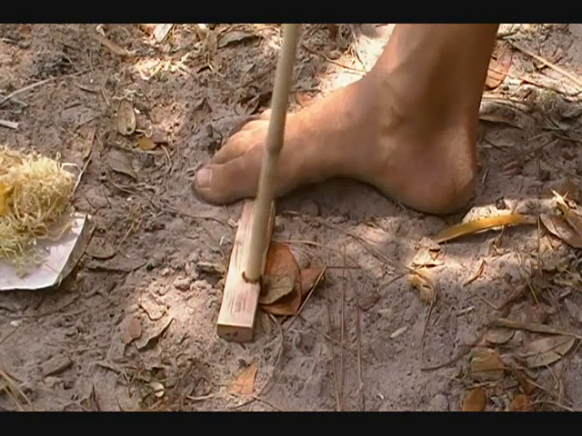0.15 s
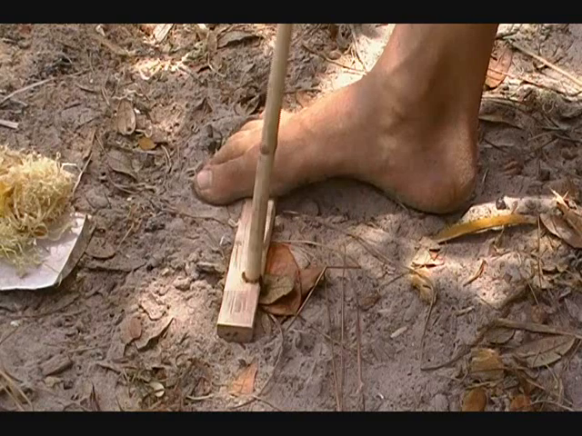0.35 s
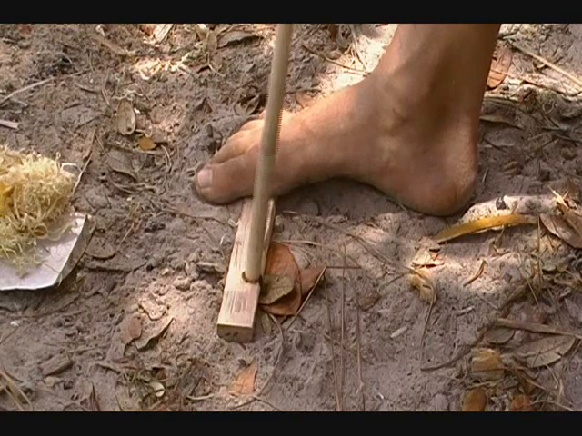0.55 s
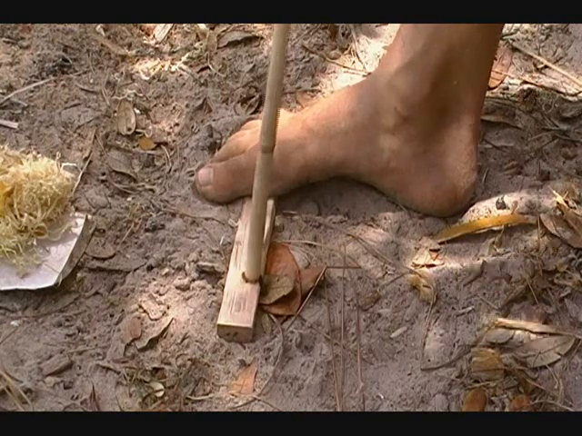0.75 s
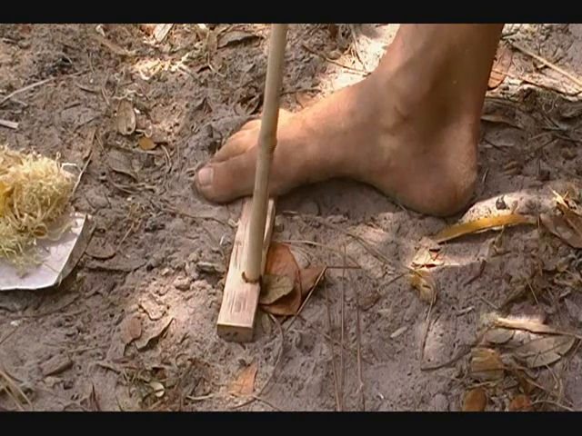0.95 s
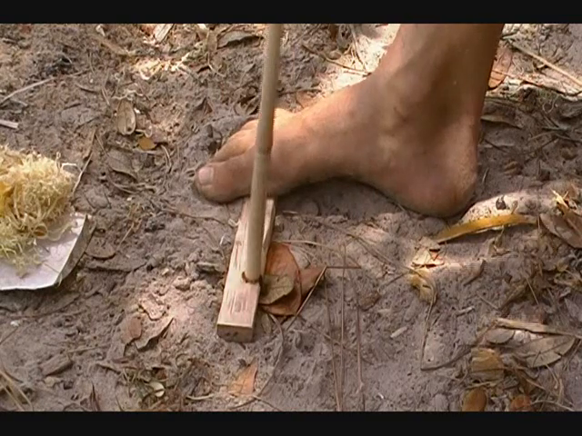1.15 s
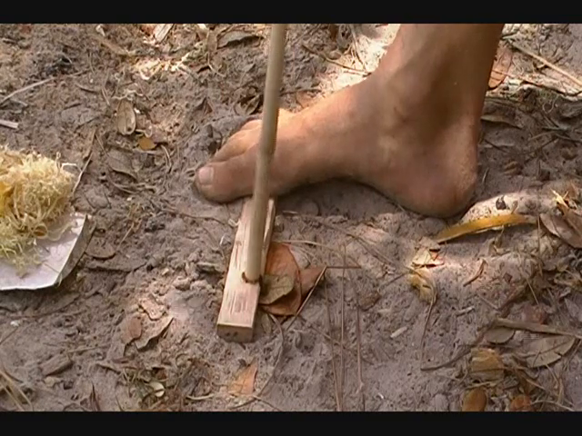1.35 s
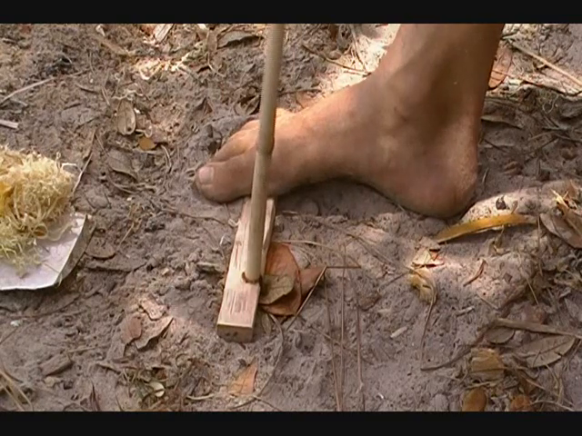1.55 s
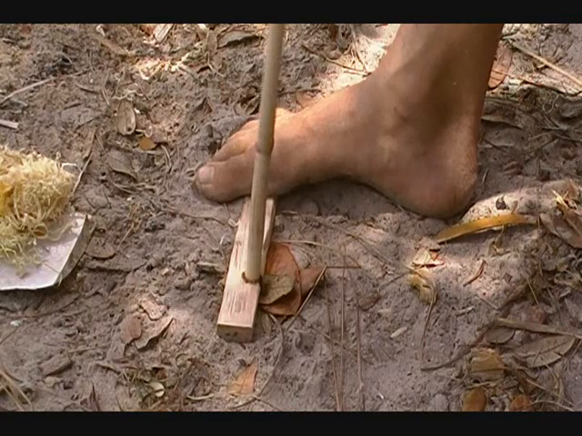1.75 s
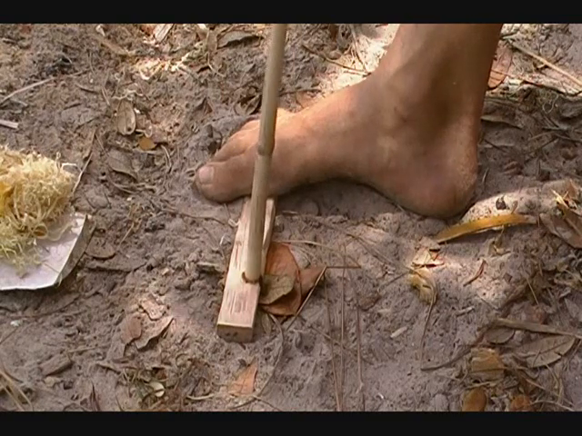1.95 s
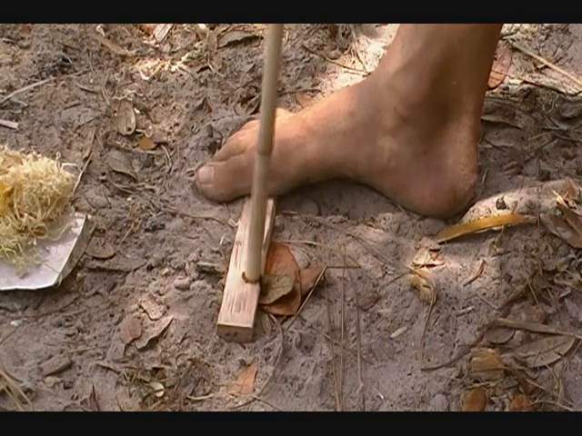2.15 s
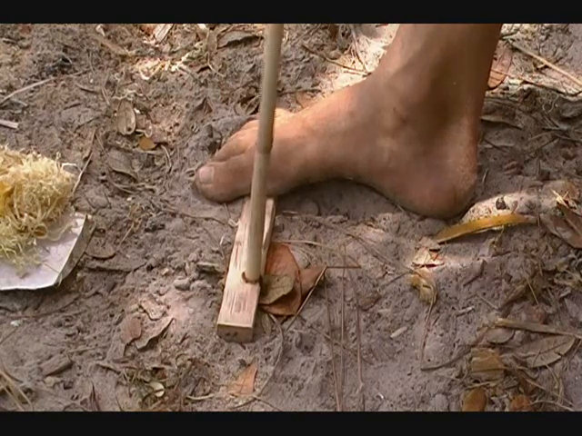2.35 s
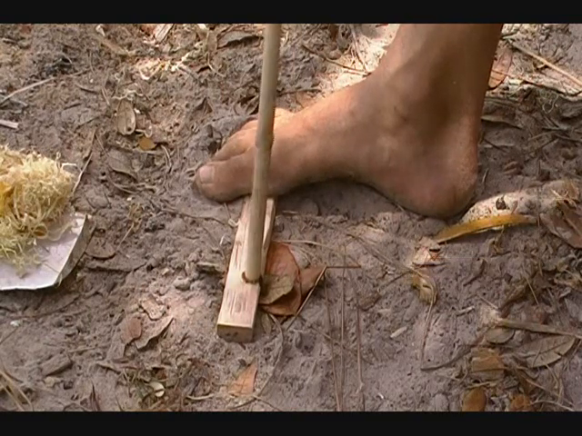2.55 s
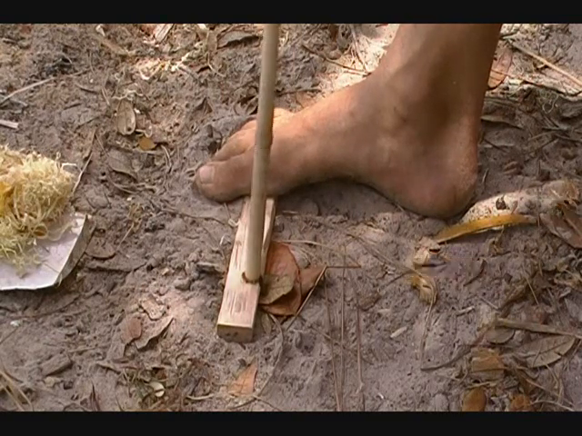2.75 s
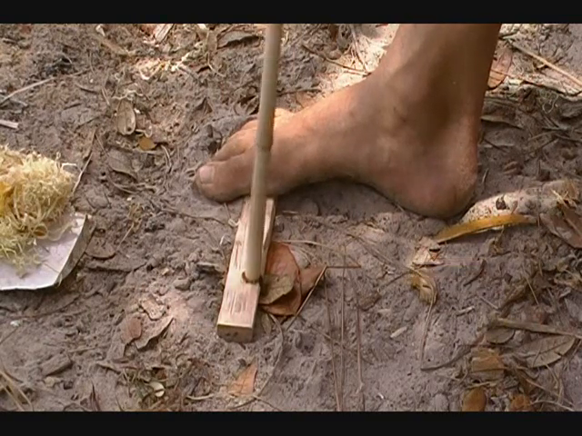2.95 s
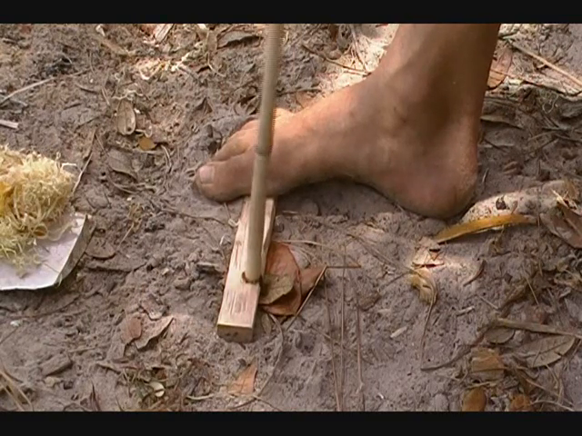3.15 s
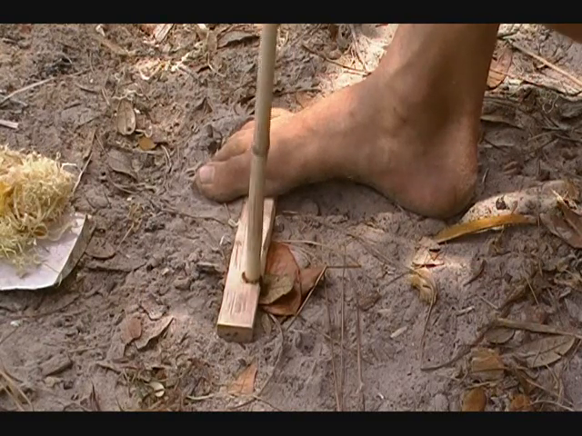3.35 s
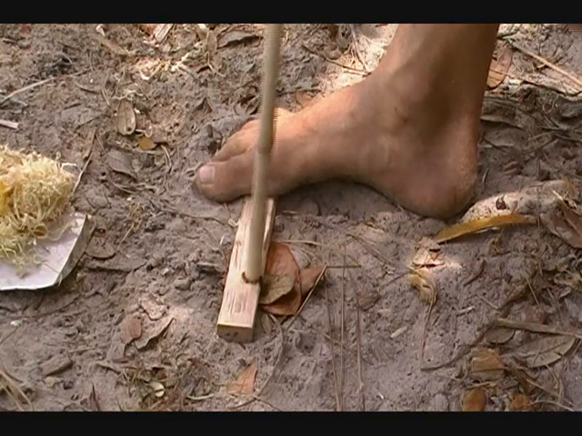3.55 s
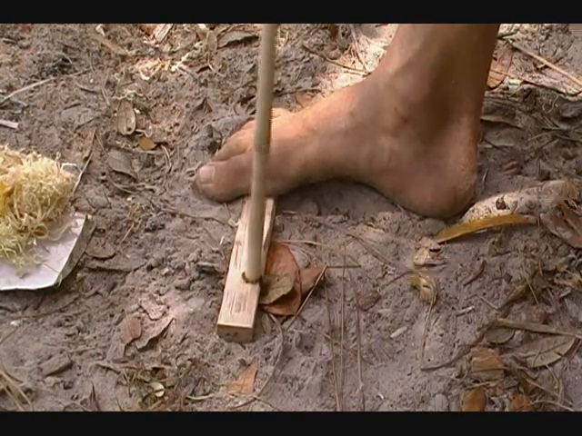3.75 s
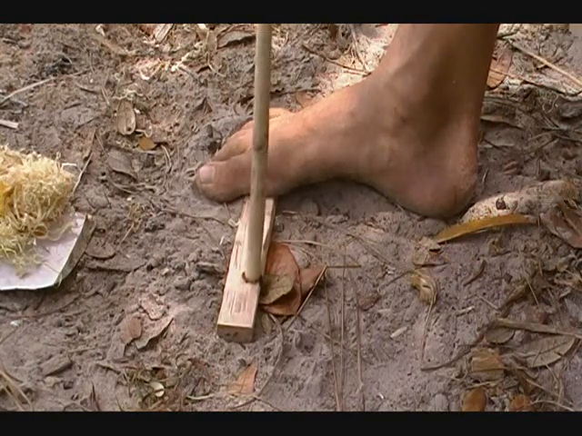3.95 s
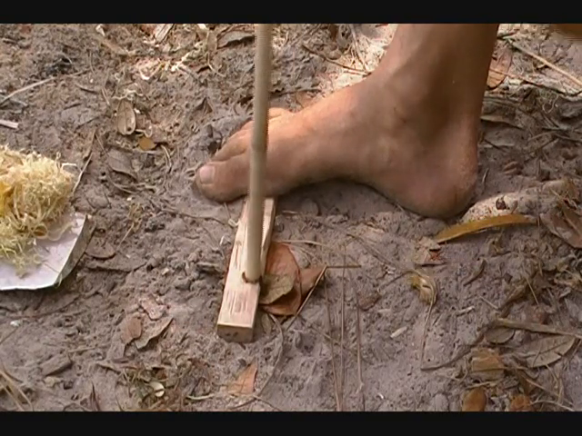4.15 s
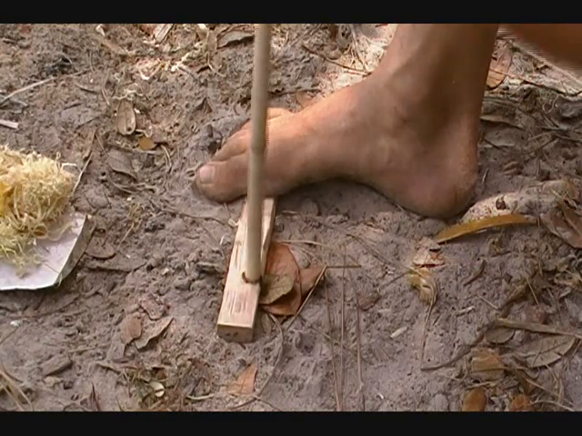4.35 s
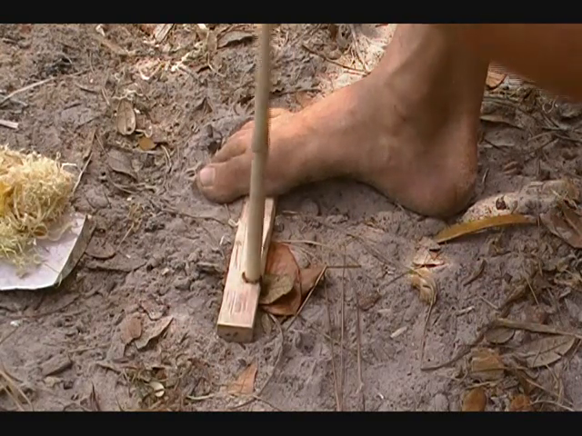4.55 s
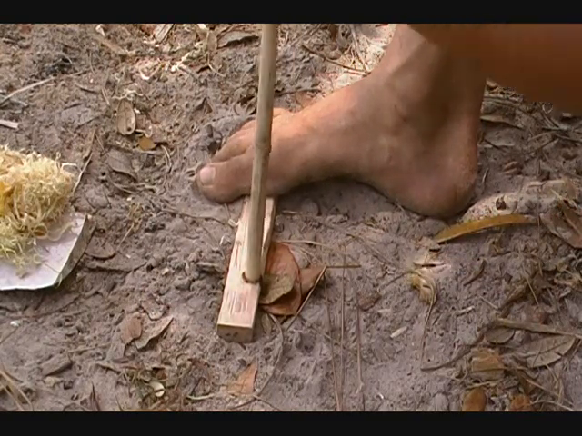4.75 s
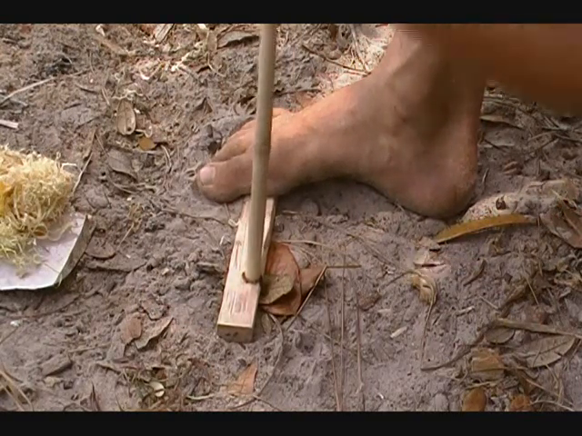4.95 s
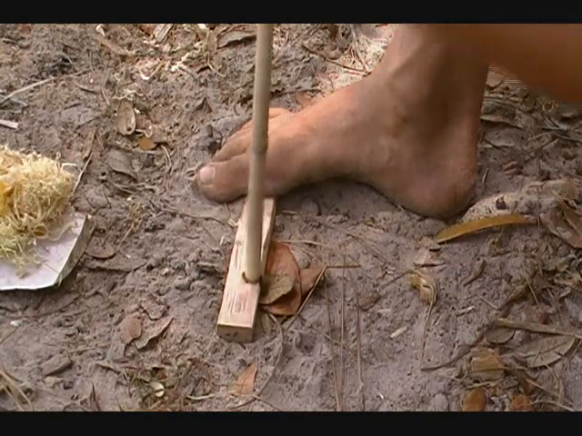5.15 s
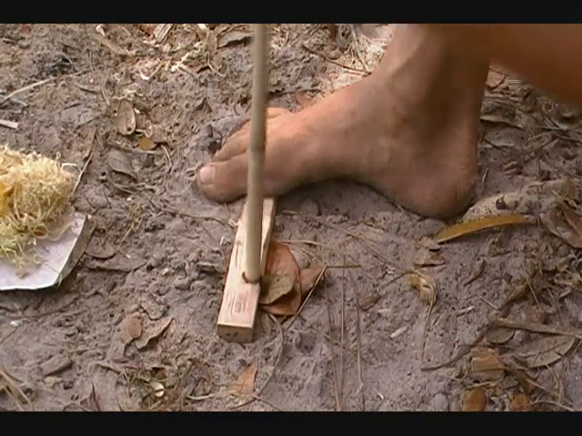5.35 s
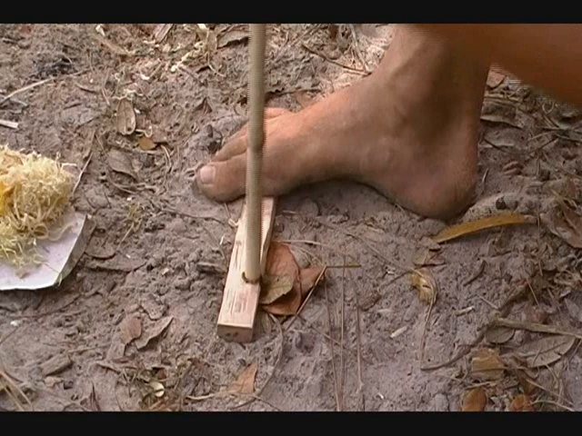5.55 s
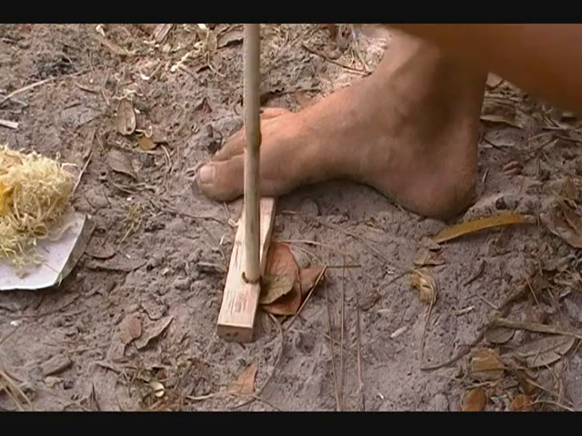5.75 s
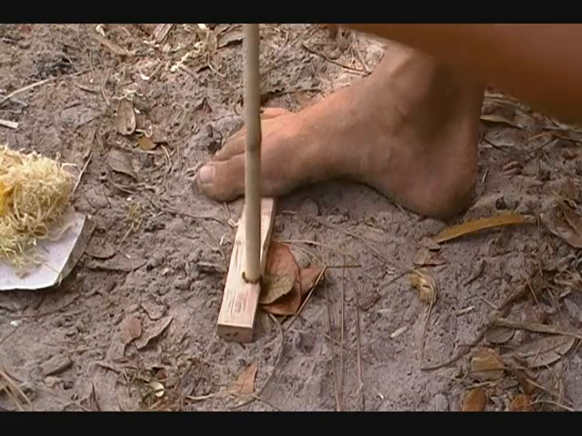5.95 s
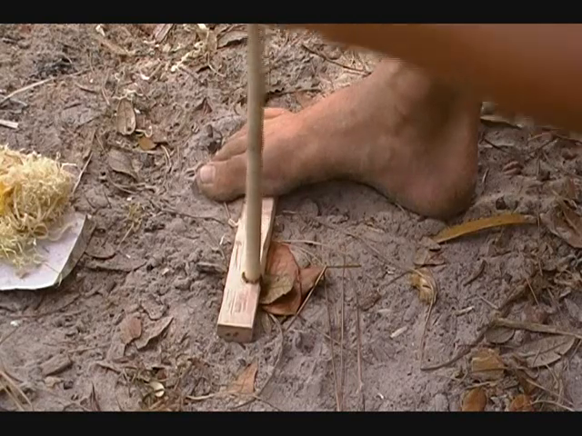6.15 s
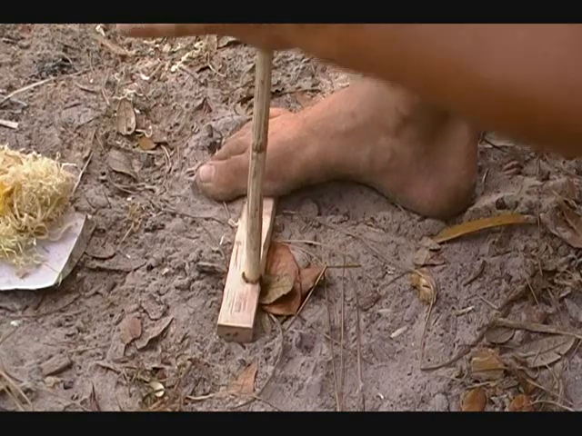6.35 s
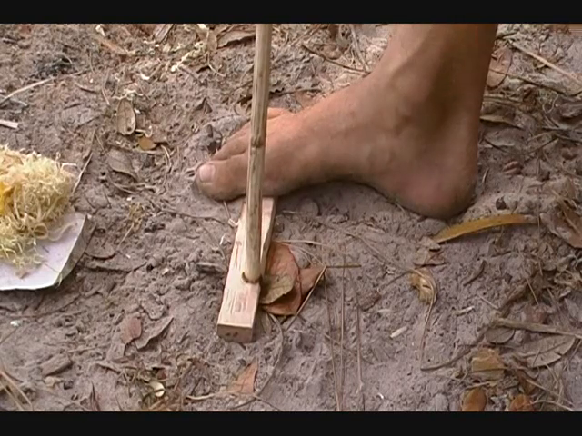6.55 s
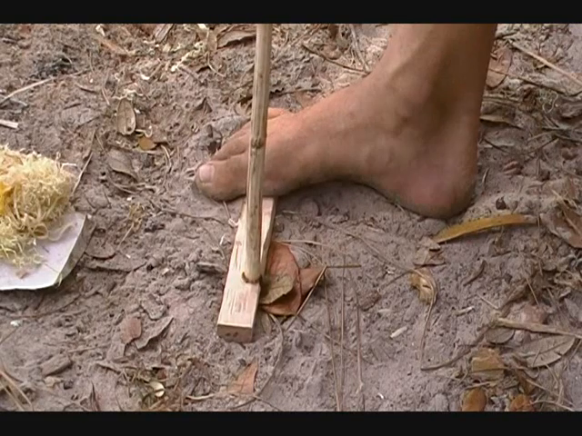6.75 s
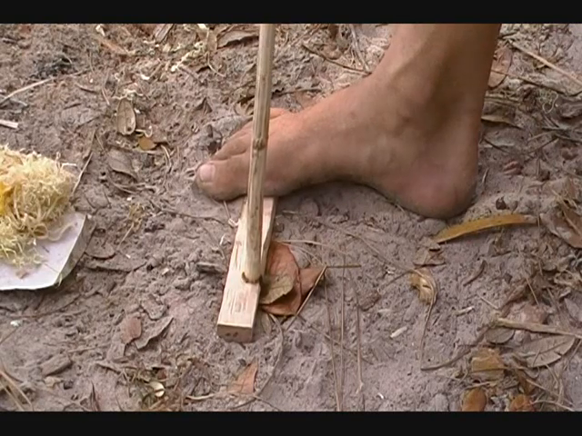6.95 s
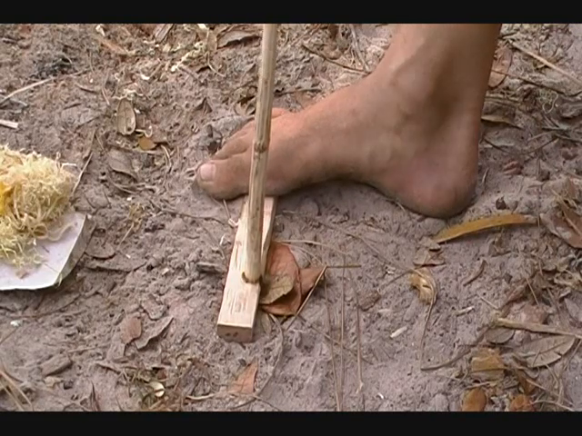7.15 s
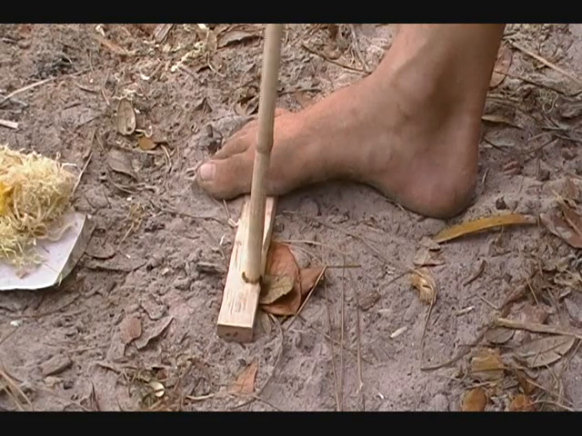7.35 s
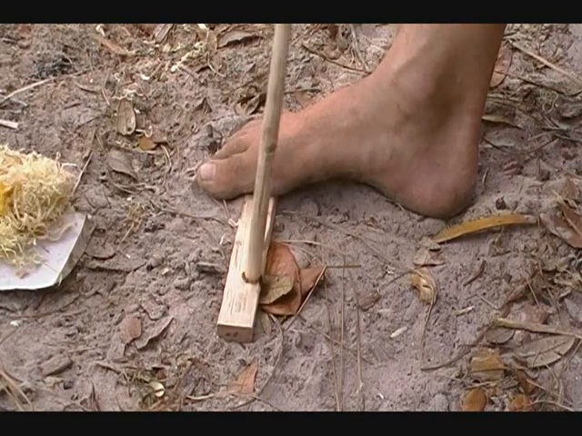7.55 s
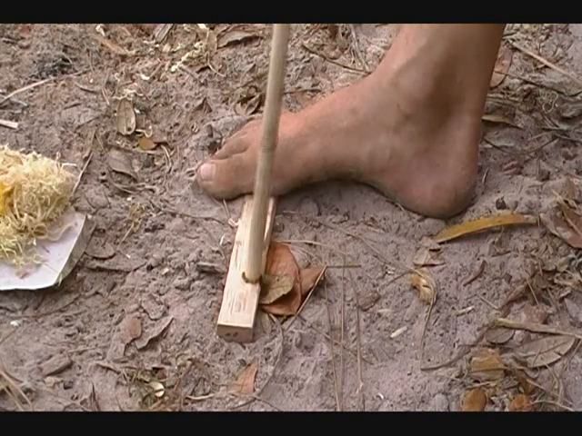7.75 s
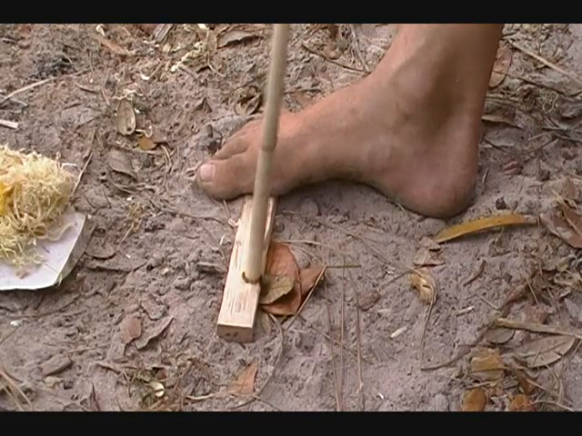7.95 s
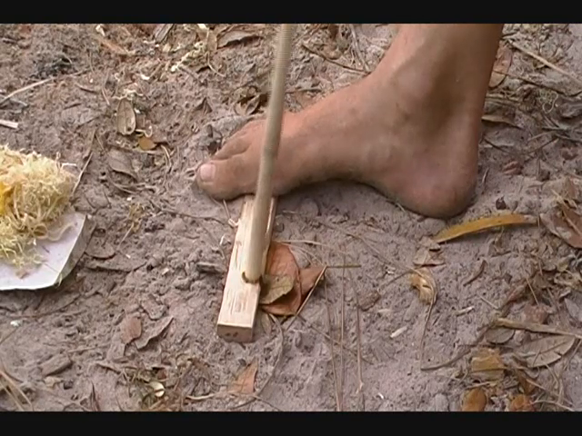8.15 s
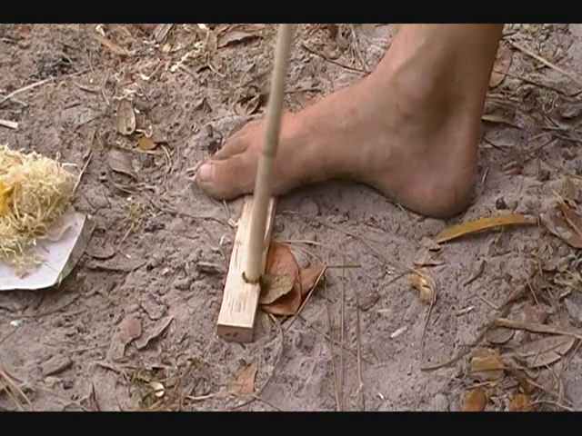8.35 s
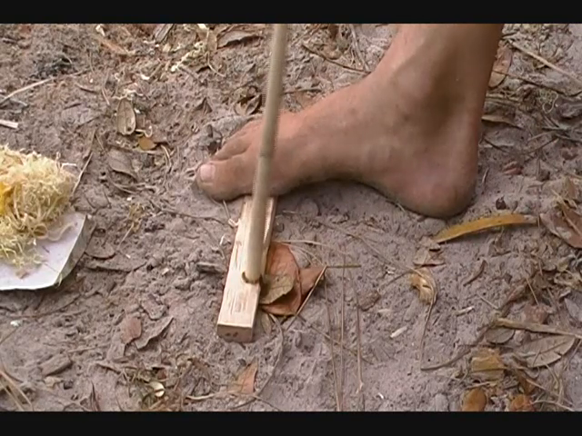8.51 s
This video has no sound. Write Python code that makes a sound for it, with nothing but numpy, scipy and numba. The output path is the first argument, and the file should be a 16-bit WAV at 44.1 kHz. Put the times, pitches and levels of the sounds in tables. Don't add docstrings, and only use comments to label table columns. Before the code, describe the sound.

Fast, rhythmic hissing rubs of skin on a wooden stick, about nine a second, pause briefly as a low truck engine swells past.

```python
import sys
import numpy as np
from scipy import signal
from scipy.fft import rfft, irfft, next_fast_len
from scipy.io import wavfile
from scipy.ndimage import uniform_filter1d
from numba import njit

SR = 44100
rng = np.random.default_rng(int(sys.argv[2]) if len(sys.argv) > 2 else 0)


def natural_amplitude(level_db):
    exponent = np.asarray(level_db, float) / 20
    return 10 ** exponent


def bounce(signal):
    frames = np.transpose(np.atleast_2d(signal))
    limited = np.clip(frames, -1, 1)
    pcm = np.round(limited * 32767).astype(np.int16)
    wavfile.write(sys.argv[1], SR, pcm)


N = 382788

# f/Hz, density/dB
AIR_SPECTRUM = [(300, -5.5), (500, -10), (1000, -0.5), (2000, -8), (4000, -17.5), (8000, -48), (15000, -57)]
# f/Hz, density/dB
ROAR_SPECTRUM = [(180, -26), (300, -2), (336, -18), (371, -6.5), (459, -7), (898, -4.5), (1080, -4.5),
                 (3170, -13.5), (4050, -16.5), (8050, -29), (15000, -41)]
# f/Hz, density/dB
RUMBLE_SPECTRUM = [(13, -71), (22, -9), (32, -4), (48, -0.5), (65, -1.5), (114, 4.5), (263, -6.5),
                   (381, -21.5), (420, -13.5), (550, -16), (920, -120)]
# t/s, roar level/dB, rumble gain/dB
ROAD_LEVELS = [
    (0, -68, 6),
    (.6, -66, 3.5),
    (4.4, -59.5, 4),
    (5.4, -60, 8.5),
    (6, -55, 11.5),
    (6.4, -46, 14),
    (6.8, -48, 15.5),
    (7.35, -54.5, 8.5),
    (8.68, -53.5, 8),
]
# t/s, firing line/dB, uneven banks (order 9)/dB, overtone (order 12)/dB
ENGINE_LEVELS = [(0, -64, -81, -63), (1.3, -66, -70, -74), (1.7, -47, -57.5, -50.5), (2.75, -45, -58, -54),
                 (3.2, -47, -62, -52.5), (3.7, -39.5, -56, -43.5), (4.97, -38, -63, -48.5),
                 (5.06, -48, -45, -40), (5.17, -41.5, -45.5, -57), (5.92, -32.5, -38, -65),
                 (6.27, -26.5, -44.5, -45.5), (6.39, -18, -48, -38), (6.58, -25.5, -44, -46),
                 (6.79, -18.5, -42, -36), (7.05, -32, -44.5, -48.5), (7.72, -37, -39, -59),
                 (7.85, -46, -40.5, -47.5), (8.68, -54, -38, -45.5)]
# t/s, f/Hz
FIRING_RATE = [(0, 64.5), (4.95, 69), (5.02, 83.5), (5.11, 87), (5.19, 101), (5.8, 113), (6.2, 125.2),
               (6.4, 128.2), (6.6, 129.9), (7, 117.4), (7.2, 108), (7.7, 102.2), (8, 95.2), (8.2, 92.6),
               (8.4, 93.8), (8.68, 94)]
# order, level re order 8/dB
LOW_ORDERS = [(4, -15), (5, -17), (10, -14)]
# order, level re the louder of orders 6 and 9/dB
HIGH_ORDERS = [(11, -30), (13, -31), (14, -31), (15, -32), (17, -34), (18, -29), (21, -34), (24, -39)]
# t/s, length/s,
# level/dB, centre f/Hz, width/Hz
REGRIPS = [
    (0, 0.0049, -47, 8000, 8000),
    (7.5, 0.055, -57, 9700, 4700),
    (7.148, 0.0044, -50, 4000, 8000),
    (7.405, 0.037, -60, 9000, 8000),
    (7.5, 0.016, -43.5, 2400, 2100),
    (0, 0.0087, -38.5, 1700, 5100),
    (7.428, .02, -52, 7000, 9000),
    (5, .03, -67, 7000, 9800),
    (7, .006, -44, 4000, 5000),
]
# t/s, peak/dB, f/Hz
CATCHES = [(0.394, -37.5, 4500), (0.65, -38.5, 4700), (0.692, -38, 5460), (1.288, -37.5, 2610),
           (1.51, -32.5, 2810), (1.511, -37, 4550), (1.731, -35, 2780), (2.027, -38, 2590),
           (2.4, -37, 4700), (3.084, -32.5, 3850), (3.309, -34, 3120), (3.395, -34, 4600),
           (3.537, -33, 3320), (3.869, -34, 4650), (4.003, -30.5, 4540), (4.02, -34, 3400),
           (4.087, -35, 3290), (4.317, -31.5, 3250), (4.545, -35, 3770), (4.769, -35.5, 2770),
           (4.931, -34.8, 2900), (5.005, -32.5, 3440), (5.38, -33, 3390), (5.458, -32, 3360),
           (5.665, -33, 3250), (5.895, -32.5, 3910), (7.944, -36, 2140), (8.17, -35.8, 2290),
           (8.348, -33, 4550), (8.394, -36.2, 2220),
           (0.909, -38, 4740), (1.188, -42, 4995), (1.354, -45, 4370), (1.584, -43, 3640),
                 (1.812, -41, 2810), (1.943, -39, 2650), (1.958, -43, 5630), (2.152, -44, 2430),
                 (2.175, -39, 3760), (2.624, -37.5, 2730), (2.94, -39, 3230), (3.086, -36, 5640),
                 (3.167, -42, 2860), (3.202, -39, 4130), (3.847, -38, 3240), (3.886, -37.5, 3370),
                 (4.688, -37.5, 2910), (5.153, -36.5, 3040), (5.234, -38, 2920), (5.461, -37, 4070),
                 (5.493, -36, 4260), (5.889, -35, 2890), (5.894, -38, 5330), (6.035, -39, 2940),
                 (6.1, -39, 2970), (6.367, -41, 2870), (7.853, -37, 3310), (8.517, -35, 4420)]
# f/Hz, density/dB
SKIN_SPECTRUM = [(880, -39), (1500, -8), (1610, -12.5), (2230, -8), (3060, -5), (4690, -3), (6890, 1),
                 (10100, 2), (13800, -7), (16000, -21)]
# f/Hz, width/Hz, level/dB
STICK_MODES = [(3400, 550, -2), (3900, 490, 1), (4460, 585, 2.5), (4960, 640, -2.5), (5560, 750, -5)]
# t/s, crossed pocket f/Hz, pocket re stick/dB, edge softness/ms,
# lead of push pressure over pull (0-1), same lead for the skin hiss
GRIP = [(0, 1960, -1, 3, 0.3, -0.15), (1, 2000, 4, 2.5, .6, 0.25), (1.6, 2360, -4, 0.38, 0.5, 0.3),
        (2.1, 2420, -1, .6, 0.4, 0.35), (2.8, 2620, -10, 1.5, 0.53, 0.11), (4, 2620, -5, 1.5, 0.5, -0.36),
        (4.7, 2900, -5, 3.5, 0.1, -0.33), (5.4, 2770, -2.5, 6.4, 0.37, -0.2),
        (5.9, 2610, -4.5, 15, 0.28, -0.15), (6.5, 2980, -3.5, 8.4, 0.67, -0.039),
        (7.5, 2430, -12, 10, 0, -0.38), (7.8, 2250, 3, 0.69, 0, 0.13), (8.7, 2130, 2, 0.52, 0, -0.0028)]
# start t/s, skin
# hiss/dB, stick ring/dB
DOWNWARD_STROKES = [(0.031, -42, -47), (0.165, -43, -51), (0.313, -43.5, -55), (0.47, -43.5, -53),
                    (0.609, -43, -57), (0.74, -41.5, -57), (0.865, -41.5, -58), (0.991, -41, -55),
                    (1.116, -40.5, -50), (1.232, -40.5, -50), (1.348, -39.5, -48), (1.459, -41, -57),
                    (1.574, -40, -45), (1.682, -40.5, -54), (1.794, -39, -44), (1.898, -40.5, -52),
                    (2.006, -39.5, -44.5), (2.117, -40.5, -52), (2.231, -40, -42.5), (2.346, -40, -43),
                    (2.463, -39, -41), (2.578, -39, -44), (2.689, -40, -40.5), (2.801, -39.5, -42.5),
                    (2.919, -40, -40), (3.036, -39, -36.5), (3.146, -40.5, -38.5), (3.258, -39, -39),
                    (3.372, -42, -40.5), (3.485, -40.5, -37.5), (3.604, -41.5, -38.5), (3.722, -41.5, -36.5),
               (3.841, -42, -40), (3.956, -42, -36), (4.074, -43.5, -40.5), (4.19, -41.5, -36),
               (4.305, -44, -40.5), (4.422, -41, -33), (4.529, -43.5, -38.5), (4.644, -44.5, -39),
               (4.759, -44, -39), (4.878, -43.5, -38), (4.995, -44, -41.5), (5.105, -44, -37),
               (5.216, -43.5, -37), (5.332, -43.5, -35.5), (5.441, -43, -39), (5.552, -43.5, -34),
               (5.656, -43.5, -37), (5.766, -43, -34.5), (5.872, -43.5, -35.5), (5.985, -44, -36),
               (6.095, -44, -36), (6.201, -47.5, -40.5), (6.32, -45, -36), (6.433, -51.5, -49)]
# start t/s, skin hiss/dB, stick ring/dB
FRESH_STROKES = [(7.555, -45.5, -46), (7.694, -40.5, -36), (7.801, -42, -46), (7.906, -41, -39.5),
                 (8.019, -43, -41.5), (8.129, -41, -40), (8.245, -41.5, -41), (8.353, -41, -39),
                 (8.462, -42, -44), (8.57, -41, -42)]


def level(x, db):
    return x * natural_amplitude(db) / np.sqrt(np.mean(x ** 2))


def coloured(x, points):
    hz, db = np.transpose(points)
    size = next_fast_len(N)
    bin_hz = np.maximum(np.arange(size // 2 + 1) * SR / size, 1)
    gain = natural_amplitude(np.interp(np.log(bin_hz), np.log(hz), db, left=-90))
    return irfft(rfft(x, size) * gain, size)[..., :N]


@njit
def svf(x, hz, width_hz):
    y, b, l = np.empty(len(x)), 0., 0.
    for i in range(len(x)):
        g, k = np.tan(np.pi * hz[i] / SR), width_hz / hz[i]
        v = (b + g * (x[i] - l)) / (1 + g * (g + k))
        b, l, y[i] = 2 * v - b, l + 2 * g * v, k * v
    return y


def resonate(stereo, hz, width_hz, second_width_hz):
    hz = hz + np.zeros(N)
    return np.array([svf(svf(side, hz, float(width_hz)), hz, float(second_width_hz)) for side in stereo])


def walk(rate_hz):
    hold = int(SR / rate_hz)
    steps = np.repeat(rng.standard_normal(N // hold + 1), hold)
    return 1.8 * uniform_filter1d(uniform_filter1d(steps, hold), hold)[:N]


def pair(likeness):
    mid, side = rng.standard_normal((2, N))
    return np.sqrt((1 + likeness) / 2) * mid + np.sqrt((1 - likeness) / 2) * side * np.array([[1], [-1]])


def road():
    s, *columns = np.transpose(ROAD_LEVELS)
    roar_db, rumble_db = (np.interp(np.arange(N) / SR, s, c) for c in columns)
    roar = level(coloured(pair(0.44), ROAR_SPECTRUM), 4.08) * natural_amplitude(roar_db + 0.49 * walk(7.3))
    air = level(coloured(pair(0.76), AIR_SPECTRUM), -53) * natural_amplitude(2.06 * walk(6.7))
    rumble = level(coloured(pair(0.87), RUMBLE_SPECTRUM), -55.5) * natural_amplitude(rumble_db + 1.5 * walk(5))
    return roar + air + rumble


def truck():
    rough_db, wobble_rad, fade_db = 1.35, 0.28, 2.5
    shift_hz, cruise_eighth_db, pull_eighth_db = 85, -10, 0.7
    pipe_hz, pipe_width_hz, pipe_db = 132, 62, 19.5
    scatter_db, near_db = 3, -30
    t = np.arange(N) / SR
    s, *columns = np.transpose(ENGINE_LEVELS)
    o6_db, o9_db, o12_db = (np.interp(t, s, c) for c in columns)
    firing_hz = np.interp(t, *np.transpose(FIRING_RATE))
    cycle_hz = firing_hz / 6
    turn_rad = 2 * np.pi * np.cumsum(cycle_hz) / SR

    eighth_db = np.interp(firing_hz, [shift_hz - 10, shift_hz + 10], [cruise_eighth_db, pull_eighth_db])
    o8_db = o12_db + eighth_db + fade_db * walk(8)
    o7_db = np.minimum(o9_db, o6_db - 7)
    lines = [(6, o6_db), (7, o7_db), (8, o8_db), (9, o9_db), (12, o12_db)]
    lines += [(order, o8_db + db) for order, db in LOW_ORDERS]
    for order, db in HIGH_ORDERS:
        lift_db = pipe_db * np.exp(-((order * cycle_hz - pipe_hz) / pipe_width_hz) ** 2)
        lines.append((order, np.maximum(o6_db - 2.5, o9_db + 8.1) + db + lift_db))

    far_db = scatter_db * np.clip((near_db - o6_db) / 12, 0, 1)
    engine = np.zeros(N)
    for order, db in lines:
        share = 0.25 if order in (6, 9) else 0.6
        line_db = db + rough_db * walk(14) - far_db * walk(7) ** 2 * share
        phase_rad = order * turn_rad + wobble_rad * walk(12) + rng.uniform(0, 6.24)
        engine += np.sqrt(2) * natural_amplitude(line_db) * np.sin(phase_rad)
    return engine


def regrip():
    t, out = np.arange(N) / SR, 0
    for s, length_s, db, hz, width_hz in REGRIPS:
        u = np.clip((t - s) / length_s, 0, 9)
        brush = resonate(pair(0.53), hz, width_hz, 1.5 * width_hz)
        out = out + level(brush, db) * 3 * u * np.exp(-1.6 * u ** 2)
    return out


def catches():
    t60_s, rise_s, rough_rad = 0.047, 0.0026, 0.84
    out, t = np.zeros(N + SR), np.arange(2000) / SR
    rows = CATCHES
    flutter = uniform_filter1d(rng.standard_normal((len(rows), len(t))), 60) * 8
    envelope = natural_amplitude(-60 * t / t60_s) * np.minimum(t / rise_s, 1)
    for (s, db, hz), slip in zip(rows, flutter):
        ring = np.sin(2 * np.pi * hz * t + rough_rad * slip) * envelope
        out[int(s * SR):int(s * SR) + len(t)] += natural_amplitude(db + 7.5) * ring
    return out[:N]


def palms():
    push_share, pull_share, last_period_s = 0.71, 0.68, 0.11
    lead_s, stop_ms = 0.0016, 2.6
    linger_s, stick_late_s = 0.0043, -0.0014
    creep_s, creep_db = 0.011, -20
    open_hz, push_pocket_db = 3250, 2.5
    sag_db, press_db, middle = 3.0, 7, 0.49
    t = np.arange(N) / SR
    start_s, skin_db, stick_db = np.transpose(DOWNWARD_STROKES + FRESH_STROKES)
    s, *grip = np.transpose(GRIP)
    pocket_hz, lift_db, soft_ms, early, skin_early = (np.interp(t, s, c) for c in grip)

    period_s = np.diff(start_s, append=np.inf)
    period_s = np.where(period_s > 2 * last_period_s, last_period_s, period_s)
    push = np.arange(len(start_s)) % 2 == 0
    length_s = period_s * np.where(push, push_share, pull_share)
    end_s = start_s + length_s
    k = np.searchsorted((end_s[:-1] + 4 * start_s[1:]) / 5, t)
    way = np.where(push, 1, -1)[k]
    u = np.clip((t - start_s[k]) / length_s[k], -0.2, 1.2)
    skin_db, stick_db = skin_db[k], stick_db[k]

    jerk = 1 / (1 + np.exp(np.clip((start_s[k] - lead_s - t) * 1000 / soft_ms, -50, 50)))
    jerk = jerk ** 1.52

    def slow(late_s):
        return 1 / (1 + np.exp(np.clip((t - end_s[k] - late_s) * 1000 / (stop_ms + 0.54 * soft_ms), -50, 50)))

    grain = pair(0.78) * natural_amplitude(0.95 * walk(400) + 0.64 * walk(60))
    past = (u - 0.42 + way * skin_early / 2) / 0.5
    skin_sag_db = sag_db * np.where(past > 0, 1, 0.6) * past ** 2
    skin = level(coloured(grain, SKIN_SPECTRUM), 0) * natural_amplitude(skin_db + 4.5 - skin_sag_db)
    dull = np.clip((-39 - skin_db) / 12, 0, 0.6)
    skin = skin - dull * np.array([svf(side, 13000 + 0 * t, 11000.0) for side in skin])

    press = ((u - middle + way * early / 2) / 0.5) ** 2
    hz = pocket_hz * (1 + 0.05 * walk(25)) + (open_hz - pocket_hz) * (2 * u - 1) ** 2
    pocket_db = stick_db + lift_db + way * push_pocket_db - 4.5 - press_db * press + 2.1 * walk(90)
    pocket = level(resonate(grain, hz, 950, 1430), 0) * natural_amplitude(pocket_db)

    stick = 0
    for mode_hz, width_hz, db in STICK_MODES:
        stick = stick + natural_amplitude(db + 2.54 * walk(55)) * resonate(grain, mode_hz, width_hz, 5.3 * width_hz)
    stick = level(stick, 0) * natural_amplitude(stick_db - 1.0 - 0.52 * press_db * press)

    hiss = (slow(linger_s) + natural_amplitude(creep_db) * slow(creep_s)) * skin
    return jerk * (hiss + slow(stick_late_s) * (pocket + stick))


def scene():
    hands = palms() + catches() + regrip()
    hands_gain = natural_amplitude(np.array([[-0.1], [0.1]]))
    truck_gain = natural_amplitude(np.array([[-0.2], [0.2]]))
    return hands * hands_gain + truck() * truck_gain + road()


def roll_off(x):
    return signal.sosfilt(signal.butter(12, 15870, fs=SR, output="sos"), x)


def record(dry):
    whine_hz, whine_db = 7867, -73.5
    whine = natural_amplitude(whine_db) * np.sin(2 * np.pi * whine_hz * np.arange(N) / SR)
    top_cut = signal.ellip(10, 0.3, 80, 15550, fs=SR, output="sos")
    mix = signal.sosfilt(top_cut, dry + whine)
    return roll_off(mix)


dry = scene()
out = record(dry)
bounce(out)
```